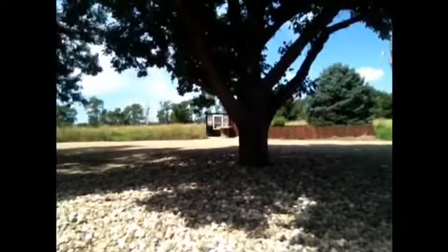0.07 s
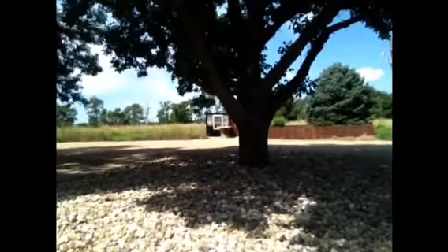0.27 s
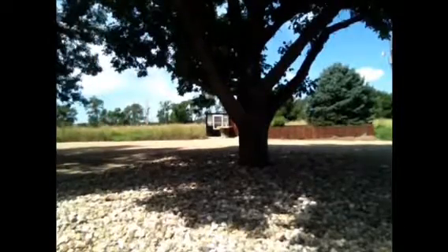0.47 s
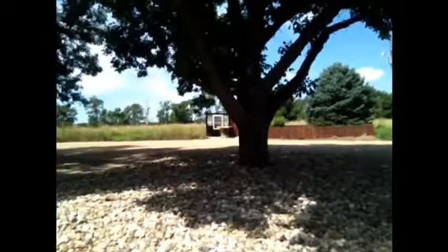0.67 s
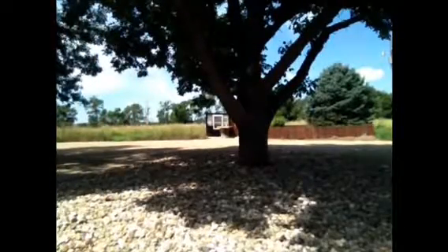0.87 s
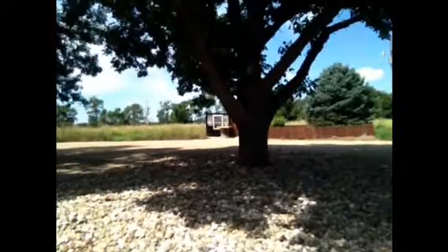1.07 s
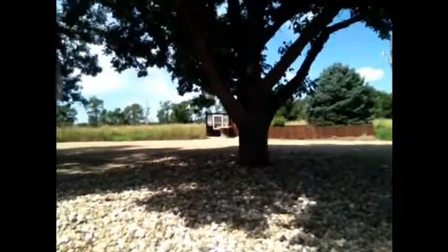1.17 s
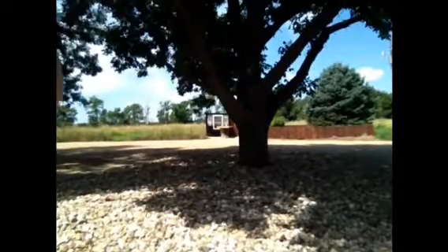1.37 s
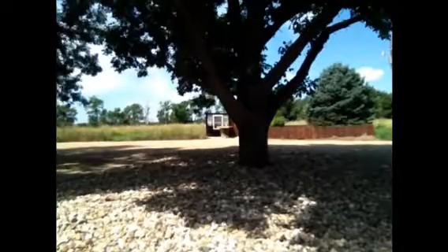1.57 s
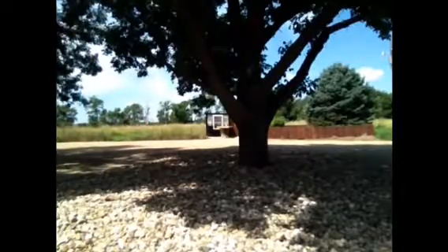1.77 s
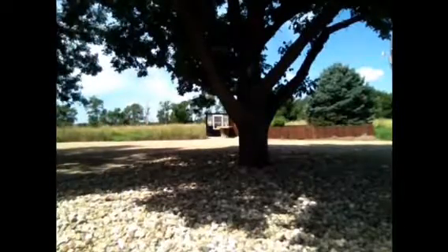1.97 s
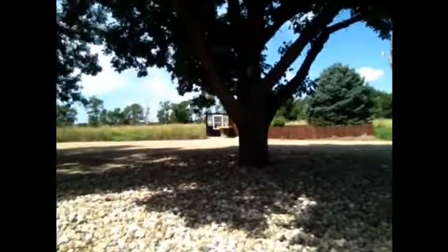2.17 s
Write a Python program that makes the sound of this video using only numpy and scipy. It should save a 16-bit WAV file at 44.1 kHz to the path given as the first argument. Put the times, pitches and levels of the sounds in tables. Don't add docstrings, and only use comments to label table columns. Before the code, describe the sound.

Close to the microphone, a hard rattling knock on a wooden board, small plastic ticks, then two light casing clicks, the second trailing into fumbling; behind them, very faint bird chirps, low distant hum and hiss.

```python
import sys
import numpy as np
from scipy import signal
from scipy.fft import rfft, irfft
from scipy.io import wavfile
from scipy.ndimage import uniform_filter1d

SR = 44100
rng = np.random.default_rng(int(sys.argv[2]) if len(sys.argv) > 2 else 0)


def wrap_up_sound(samples):
    columns = np.atleast_2d(samples).T
    tamed = np.clip(columns, -1, 1)
    steps = np.round(tamed * 32767).astype(np.int16)
    wavfile.write(sys.argv[1], SR, steps)


def invert_db(x):
    u = np.asarray(x, float) / 20
    return 10 ** u


N = 97020

# start in seconds, peak level in dB, contact time in ms, ping in Hz.
KNOCKS = [(.2058, -45, 0.11, 900), (.2095, -19.5, 0.055, 1100), (.2148, -12, 0.057, 2970),
          (.2156, -7.5, 0.16, 1100), (.2195, -10, 0.28, 450), (.2385, -26, 0.029, 900),
          (.2443, -16, 0.14, 770), (.268, -31, 0.17, 710), (.4755, -49.5, 0.053, 2150),
          (.478, -51.5, 0.065, 3100), (.4765, -49, 0.12, 4300)]
# frequency in Hz, level in dB, T60 in seconds.
BOARD = [(130.9, -25, 0.59), (218.4, -17.5, 0.51), (335, -9, 0.45), (393, 1, 0.29), (670, 5, .22),
         (900, -6, 0.29), (1200, -2, 0.19), (1620, -4, 0.14), (2360, -5.5, 0.062), (3200, -13, 0.15),
         (5000, -4.5, 0.039), (8000, -13.5, 0.16), (13840, -32, 0.045)]
# frequency in Hz, level in dB, T60 in seconds.
BOARD_TONES = [(274, -18, 0.083), (432, -6.5, 0.099), (607.6, -13, 0.21), (634, -7, .15),
               (676.4, -11.5, 0.22), (753.5, -14, 0.21), (818, -16, 0.14), (895.8, -14, 0.27),
               (977, -13.5, 0.033), (1200, -6.5, 0.06), (1918, -12, 0.046), (2167, -10, 0.035),
               (2340, -17, 0.062), (3070, -20.5, .04)]


def knocks():
    return strikes(KNOCKS, body(BOARD, BOARD_TONES), ring_db=-3.0, crack_db=-18.0)


# start in seconds, peak level in dB, contact time in ms, ping in Hz.
TAPS = [(1.007, -47.5, 0.35, 750), (1.5146, -13.5, 0.26, 1565), (1.5165, -28, 0.085, 950),
        (1.5235, -27.5, 0.04, 970), (1.538, -35, 0.26, 1350), (1.555, -33.5, 0.11, 1400),
        (1.7241, -17, 0.23, 950), (1.729, -29.5, 0.42, 620), (1.7335, -23.5, 0.086, 1524),
        (1.739, -26.5, 0.069, 2300), (1.775, -39, .3, 900), (1.784, -44, 0.25, 1450),
        (1.788, -38, 1.2, 353), (1.793, -35, 0.21, 990), (1.7975, -30, 0.61, 1700),
        (1.7985, -45, 0.098, 3200), (1.81, -37, 0.22, 1440), (1.817, -34, 0.24, 1000),
        (1.822, -45, 0.16, 2300), (1.827, -37, 0.11, 1450), (1.835, -41, 2.4, 300),
        (1.844, -38.5, 0.19, 1450), (1.8465, -40.5, 0.31, 1450), (1.86, -63, 0.26, 1500),
        (1.872, -49.5, 0.12, 1450)]
# frequency in Hz, level in dB, T60 in seconds.
CASING = [(168, -23, 0.16), (239, -2, 0.32), (400, -14, 0.3), (605, 11.5, 0.026), (970, -4.5, 0.16),
          (1130, -1, 0.14), (1450, -4, 0.31), (2030, -22, 0.091), (2220, 11.5, 0.076), (3100, -9.5, 0.17),
          (3900, 0.5, 0.096), (5500, -2, 0.12), (8000, -11, 0.13), (13750, -39, 0.063)]
# frequency in Hz, level in dB, T60 in seconds.
CASING_TONES = [(547, -24.5, .08), (676.3, -13.5, 0.12), (904, -13, 0.091), (950, -11.5, 0.082),
                (1247, -8.5, 0.045), (1487, -14, 0.12), (1723, -13.5, 0.11), (2364, -19, 0.091),
                (4050, -19, 0.11), (5000, -19, .06)]


def taps():
    sound = strikes(TAPS, body(CASING, CASING_TONES), ring_db=-7, crack_db=-9)
    return highpass(sound, 190)


# start in seconds, peak level in dB, upper modes against the lowest in dB, crack in dB.
TICKS = [(0.7866, -51.5, -4, -9), (0.872, -57, -9, -7), (0.893, -56, 7, -8), (0.9214, -32, 10, -9),
         (0.9236, -32, 2, -6), (0.9325, -60, -2, 0), (0.9347, -37, 6, 5), (0.9602, -45, 1, -18),
         (0.975, -46, -8, -6), (1.073, -50, 19, -19), (1.0998, -42, 8.5, -1), (1.1412, -39.5, -3, -17),
         (1.1486, -45, 3, -17), (1.1689, -35.5, 8.5, -9), (1.1754, -47.5, 7, -0.5), (1.1898, -47.5, 4, -3),
         (1.2224, -49.5, -6, -7), (1.2288, -45, -15, -3), (1.325, -49, 0, -8), (1.3438, -49, -16, -7),
         (1.3929, -39.5, -3.5, -18), (1.41, -50, -7, -1), (1.467, -54, 0, -12), (1.483, -50, -12, -12),
         (1.6428, -51, -6, -12), (1.699, -57, 0, -6)]
# frequency in Hz, level in dB, T60 in seconds.
TICK_MODES = [(1397, 8.5, 0.012), (2300, 1, 0.021), (2790, -2, 0.015), (7160, -1, .012)]
# start in seconds, level in dB, frequency in Hz, T60 in seconds.
THUMP = (2.1865, -42, 135, .06)


def ticks():
    out = np.zeros(N)
    upper_share = np.array([[0], [1], [1], [0.5]])
    for start, db, upper_db, crack_db in TICKS:
        modes = ring(TICK_MODES, rise_s=0.00089, lift_db=upper_db * upper_share, detune=0.02)
        tick = pushed(modes, push_ms=0.028) + invert_db(crack_db) * crack()
        add(out, start, invert_db(db) * tick)
    start, db, hz, t60 = THUMP
    t = np.arange(SR // 3) / SR
    thump = np.sin(2 * np.pi * hz * t) * fade(t, t60) * (1 - np.exp(-t / 0.0019))
    add(out, start, invert_db(db) * thump)
    return out


RISE_S = 0.0001


def strikes(table, response, ring_db, crack_db):
    out = np.zeros(N)
    for start, db, contact_ms, ping_hz in table:
        add(out, start, invert_db(db + ring_db) * pushed(response, contact_ms))
        ping = pushed(ring([(ping_hz, 0, 0.013)], RISE_S), contact_ms)
        snap = invert_db(crack_db) * crack() * 0.072 / contact_ms
        add(out, start, invert_db(db) * (ping + snap))
    return out


def body(shape, tones):
    mode_count, crowding = 450, 1.8
    t = np.arange(SR // 4) / SR
    shape_hz, shape_db, shape_t60 = np.array(shape).T
    place = (np.arange(mode_count) + rng.random(mode_count)) / mode_count
    hz = (shape_hz[0] + (shape_hz[-1] - shape_hz[0]) * place ** crowding)[:, None]
    db = np.interp(np.log(hz), np.log(shape_hz), shape_db)
    t60 = np.interp(np.log(hz), np.log(shape_hz), shape_t60)
    waves = np.sin(2 * np.pi * (hz * t + rng.random(hz.shape))) * fade(t, t60)
    crowd = (invert_db(db) * waves).sum(axis=0)
    out = crowd / abs(crowd).max()
    for k, (tone_hz, tone_db, tone_t60) in enumerate(tones):
        sign = (-1) ** k
        out = out + sign * invert_db(tone_db) * np.sin(2 * np.pi * tone_hz * t) * fade(t, tone_t60)
    return out * (1 - np.exp(-t / RISE_S))


def pushed(response, push_ms):
    phase = np.arange(64) / SR / (push_ms / 1000 + 1 / SR)
    push = np.sin(np.pi * np.clip(phase, 0, 1))
    out = np.convolve(response, push)[:len(response)]
    return out / abs(out).max()


def ring(modes, rise_s, lift_db=0, detune=0.0):
    t = np.arange(SR // 20) / SR
    hz, db, t60 = np.array(modes).T[:, :, None]
    level_chance, pitch_chance = rng.standard_normal((2,) + hz.shape)
    gain = invert_db(db + lift_db + 2 * level_chance)
    waves = gain * np.sin(2 * np.pi * hz * (1 + detune * pitch_chance) * t) * fade(t, t60)
    return waves.sum(axis=0) * (1 - np.exp(-t / rise_s))


def crack():
    centre_hz, width_hz = 7590, 11200
    t = np.arange(SR // 20) / SR
    noise = band(rng.standard_normal(len(t)), centre_hz, width_hz)
    return noise * (np.exp(-t / 0.0017) + invert_db(-13.5) * np.exp(-t / 0.016))


# start in seconds, length in seconds, first and last frequency in Hz, level in dB.
WHISTLES = [
    (0, .03, 4550, 4550, -72),
    (.1, .035, 7000, 6950, -76),
    (.312, .04, 4100, 4080, -74),
    (.53, .09, 5400, 5500, -73),
    (1.28, .11, 6720, 6680, -71),
    (2.115, .085, 5000, 4450, -74),
    (.275, .12, 5900, 4600, -72),
    (.684, .085, 6450, 5250, -62),
    (1.24, .05, 5950, 5900, -73),
]


def whistles():
    out = np.zeros(N)
    warble = invert_db(3 * walk(80))
    for start, length, first_hz, last_hz, db in WHISTLES:
        t, envelope = gate(length)
        hz = last_hz + (first_hz - last_hz) * (1 - t / length) ** 1.3
        tone = np.sqrt(2) * np.sin(2 * np.pi * np.cumsum(hz) / SR)
        add(out, start, invert_db(db) * envelope * tone)
    return out * warble


# start in seconds, length in seconds,
# centre in Hz, bandwidth in Hz, level in dB.
BUZZES = [(0.528, 0.059, 4240, 500, -71), (.55, 0.053, 3300, 400, -75), (0.638, 0.037, 6400, 1200, -66),
          (0.789, 0.19, 4390, 503, -71.5), (0.821, 0.14, 3200, 496, -72.5), (0.95, 0.22, 4720, 734, -69),
          (0.96, .21, 3400, 457, -72.5), (1.223, 0.095, 4420, 700, -73), (1.234, 0.081, 5900, 700, -70.5),
          (1.288, 0.2, 5000, 500, -86), (1.403, 0.084, 4180, 596, -68.5), (1.405, 0.11, 5500, 695, -67),
          (1.429, 0.11, 4850, 300, -78), (2.155, 0.033, 3460, 5000, -68.5), (.415, 0.073, 3450, 302, -73.5),
          (0.851, 0.33, 3970, 1500, -70.5), (1.243, 0.29, 5600, 2550, -67.5)]


def buzzes():
    out = np.zeros(N)
    rate_hz, depth_db = 91.5, 3
    for start, length, hz, width, db in BUZZES:
        t, envelope = gate(length)
        throb = invert_db(depth_db * walk(rate_hz))[:len(t)]
        noise = band(rng.standard_normal(N), hz, width)[:len(t)]
        add(out, start, envelope * level(throb * noise, db))
    return out


def leaf_echo(calls):
    t = np.arange(SR // 3) / SR
    echo = rng.standard_normal(len(t)) * fade(t, 0.28)
    echo = echo / np.linalg.norm(echo)
    return calls + invert_db(5) * signal.fftconvolve(calls, echo)[:N]


def gate(length):
    t = np.arange(int(length * SR)) / SR
    edge = np.clip(np.minimum(t, length - t) / 0.007, 0, 1)
    return t, np.sin(np.pi / 2 * edge)


# frequency in Hz, density in dB per Hz.
HUM = [(18, -60.5), (30, -36.5), (171, -8), (292, -9), (358, -2.5), (648, -14.5), (710, -16), (887, -17.5),
       (2500, -24), (3250, -27), (5500, -120)]


def hum():
    return level(coloured(HUM, swell_db=-4.5, flicker_db=3.6), -60)


# frequency in Hz, density in dB per Hz.
HISS = [(1180, -54), (2000, -12), (6250, -7), (6820, -8.5), (7980, -7), (10900, 0), (15200, -7.5),
        (15600, -2.5), (16000, -26)]


def hiss():
    noise = coloured(HISS, swell_db=0.6, flicker_db=1.0)
    sunk = np.arange(N) / SR > 0.83
    return level(noise * invert_db(-1.54 * sunk), -58.5)


def drone():
    return level(band(rng.standard_normal(N), 232.4, 34), -67.5)


def coloured(shape, swell_db, flicker_db):
    octave = np.log2(np.arange(N // 2 + 1) * SR / N + 1)
    shape = np.array(shape)
    shape_db = np.interp(octave, np.log2(shape[:, 0]), shape[:, 1], left=-90, right=-90)
    spectrum = rfft(rng.standard_normal(N)) * invert_db(shape_db)
    swell = swell_db * walk(1.0)
    out = np.zeros(N)
    for centre in np.arange(4.5, 14.6, 0.5):
        part = irfft(spectrum * np.clip(1 - 2 * abs(octave - centre), 0, 1), N)
        out += part * invert_db(swell + flicker_db * walk(5.96))
    return out


def walk(rate):
    hold = int(SR / rate)
    steps = np.repeat(rng.standard_normal(N // hold + 1), hold)
    smooth = uniform_filter1d(uniform_filter1d(steps, hold), hold)
    return 0.7 * smooth[:N]


def level(x, db):
    return x * invert_db(db) / np.sqrt(np.mean(x ** 2))


def fade(t, t60):
    return np.exp(-np.log(1000) * t / t60)


def add(out, start, x):
    i = max(int(start * SR), 0)
    out[i:i + len(x)] += x[:N - i]


def band(x, hz, width):
    edges = [hz - width / 2, hz + width / 2]
    return signal.sosfilt(signal.butter(2, edges, "band", fs=SR, output="sos"), x)


def highpass(x, hz):
    return signal.sosfilt(signal.butter(3, hz, "high", fs=SR, output="sos"), x)


def scene():
    background = hum() + hiss() + drone()
    plastic_damping = signal.butter(2, 7500, fs=SR, output="sos")
    plastic = signal.sosfilt(plastic_damping, ticks() + taps())
    hits = highpass(plastic + knocks(), 138)
    birds = leaf_echo(whistles() + buzzes())
    return (background + birds + hits)[None]


def band_limit(x):
    return signal.sosfilt(signal.butter(12, 15525, fs=SR, output="sos"), x)


def record(dry):
    top_cut = signal.ellip(8, 0.2, 60, 15600, fs=SR, output="sos")
    mix = signal.sosfilt(top_cut, dry)
    return band_limit(mix)


dry = scene()
out = record(dry)
wrap_up_sound(out)
```